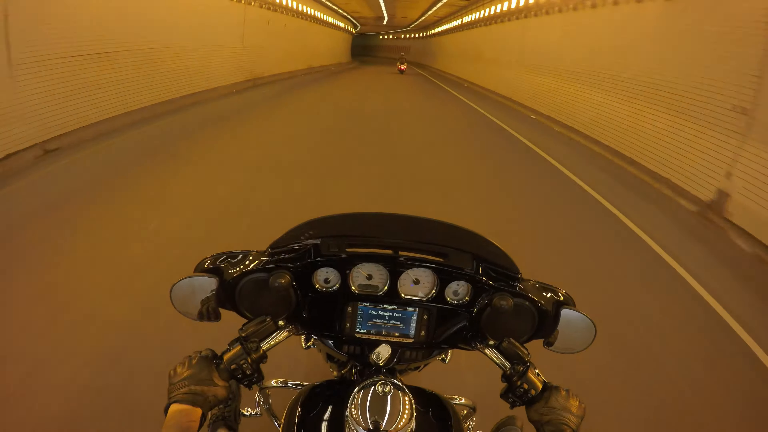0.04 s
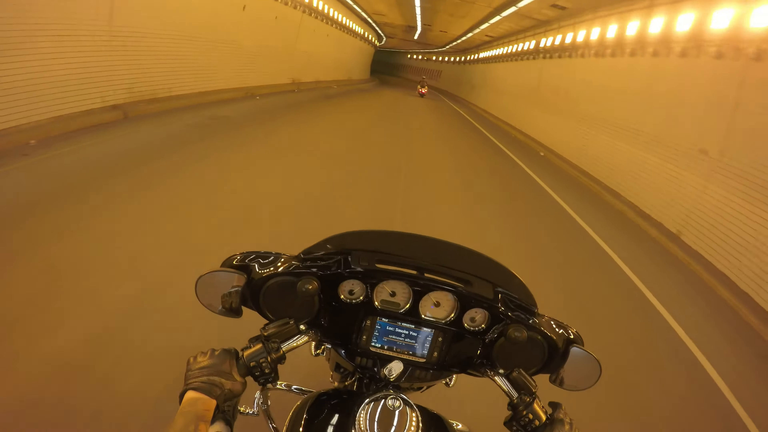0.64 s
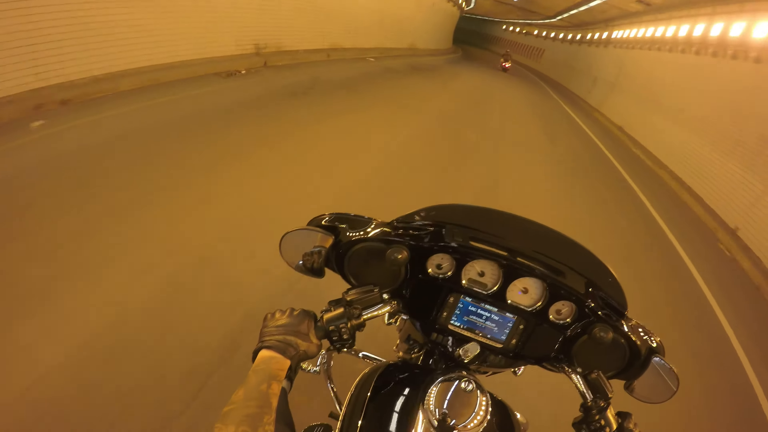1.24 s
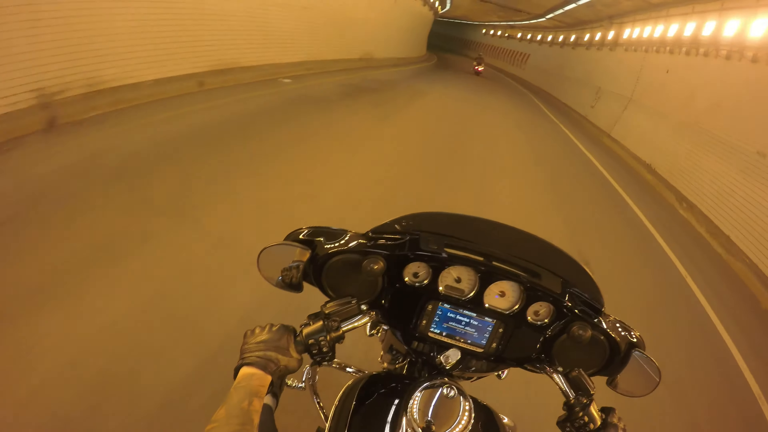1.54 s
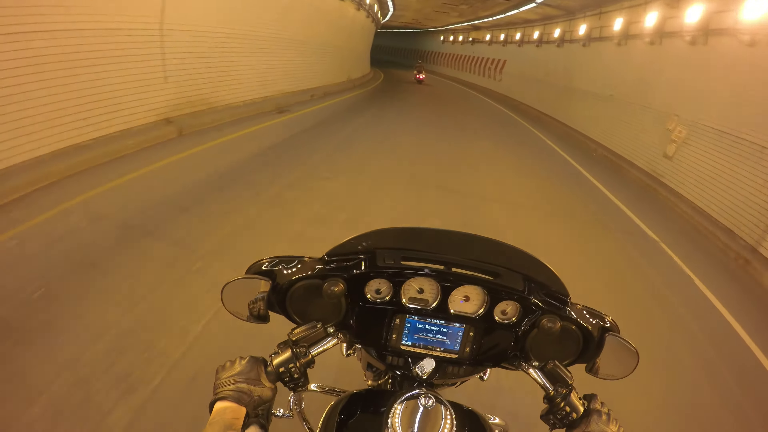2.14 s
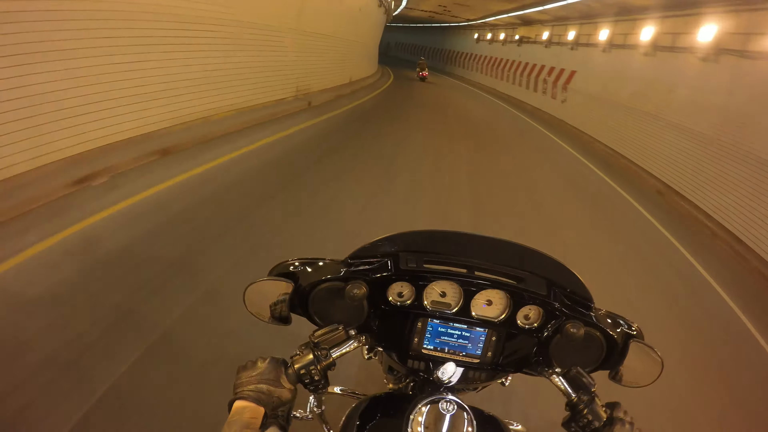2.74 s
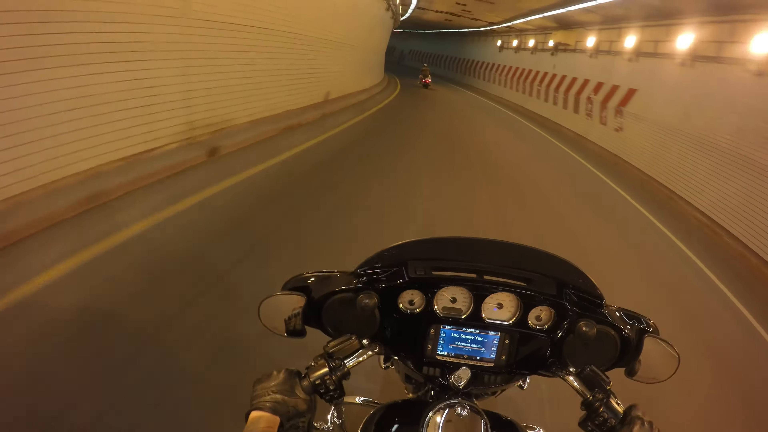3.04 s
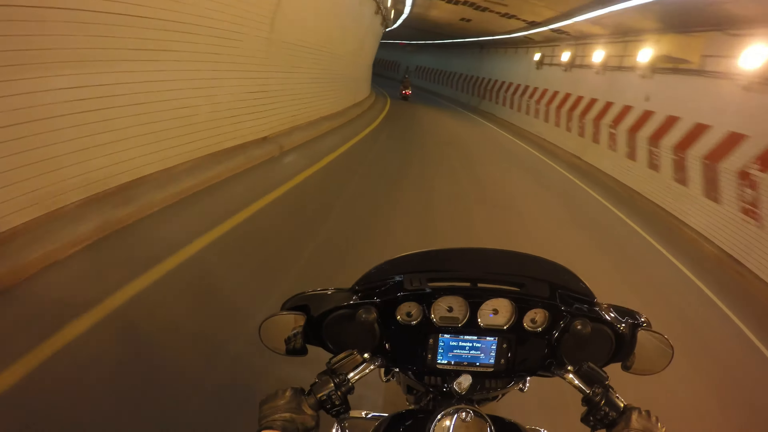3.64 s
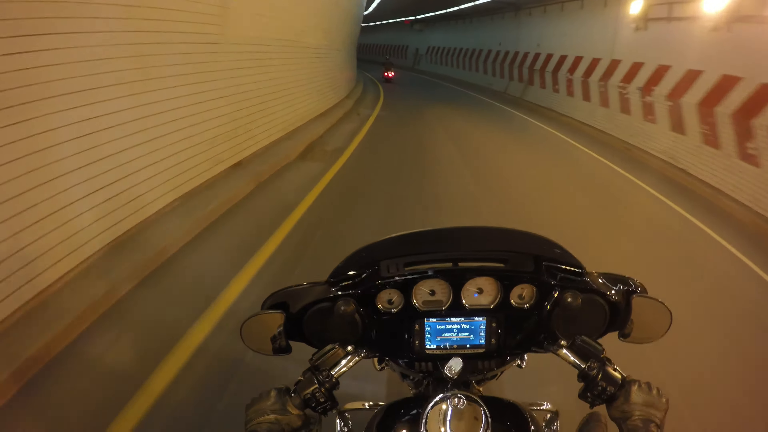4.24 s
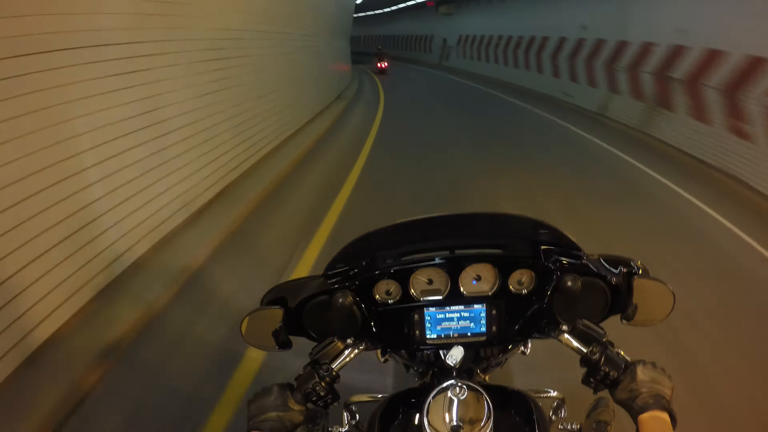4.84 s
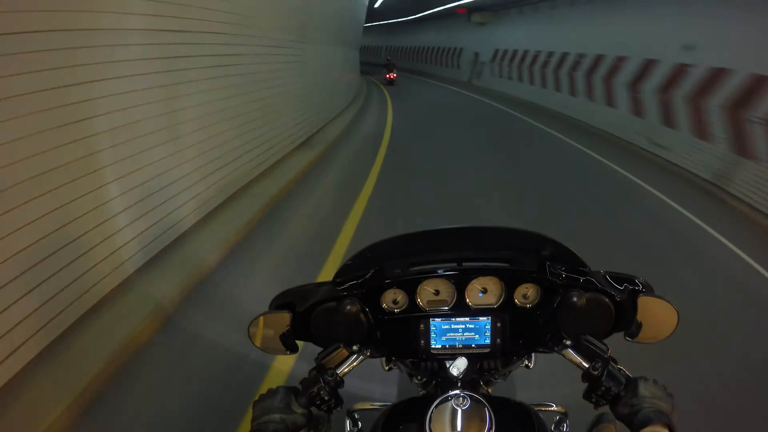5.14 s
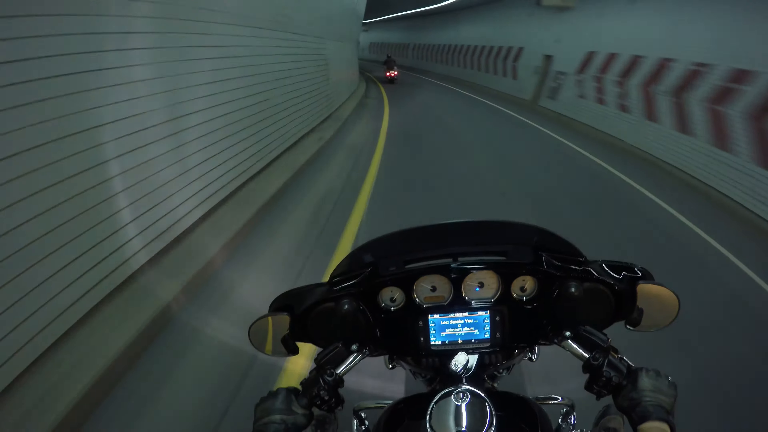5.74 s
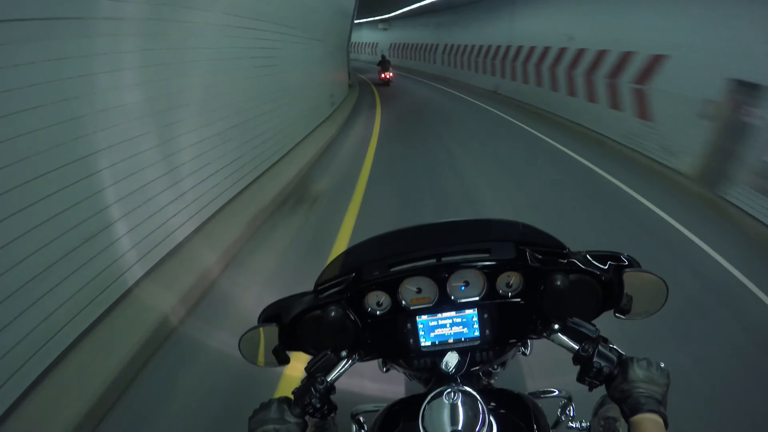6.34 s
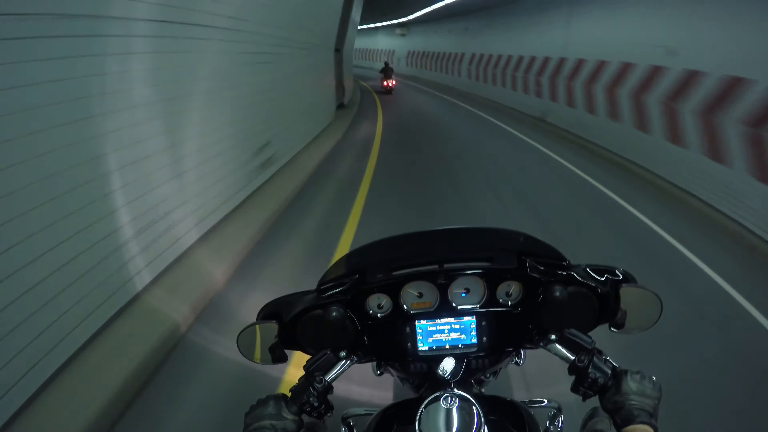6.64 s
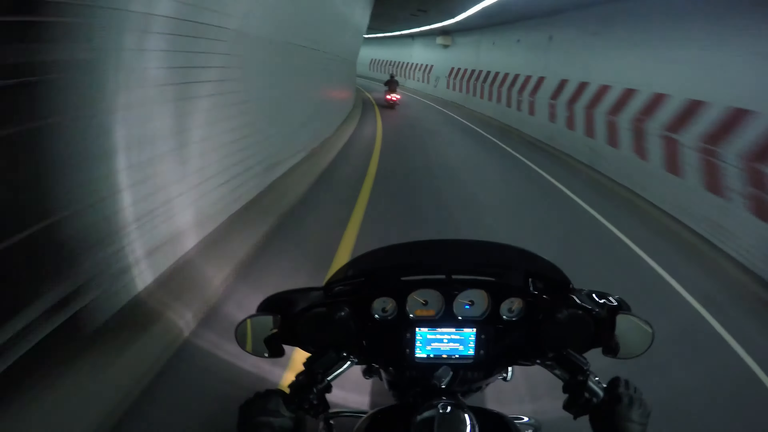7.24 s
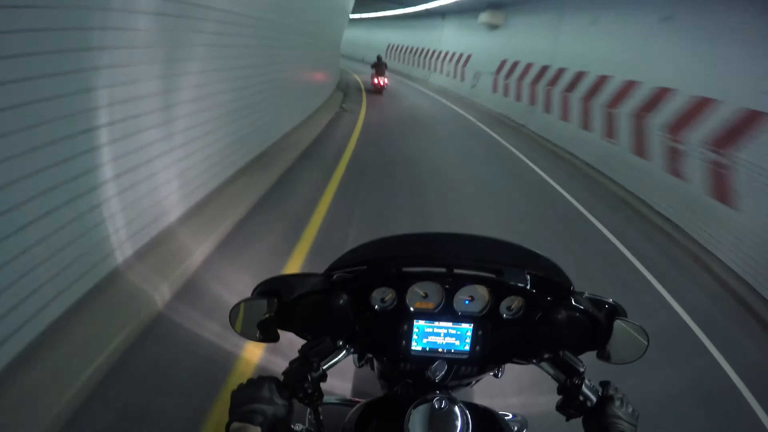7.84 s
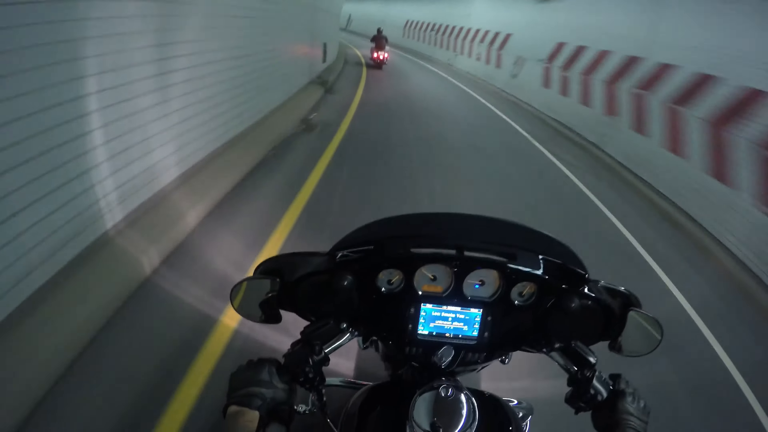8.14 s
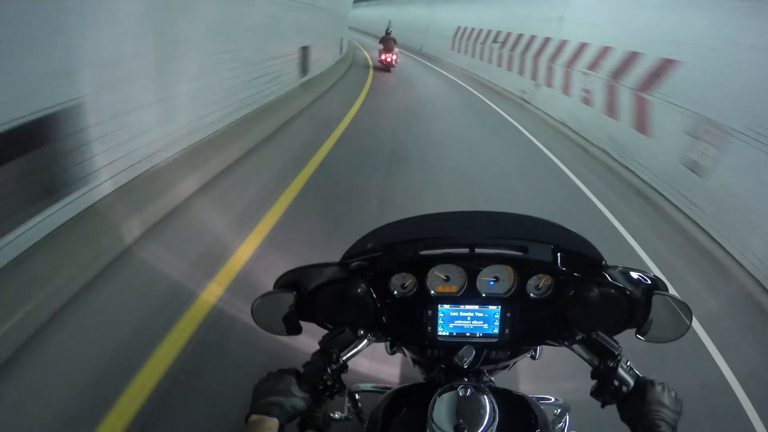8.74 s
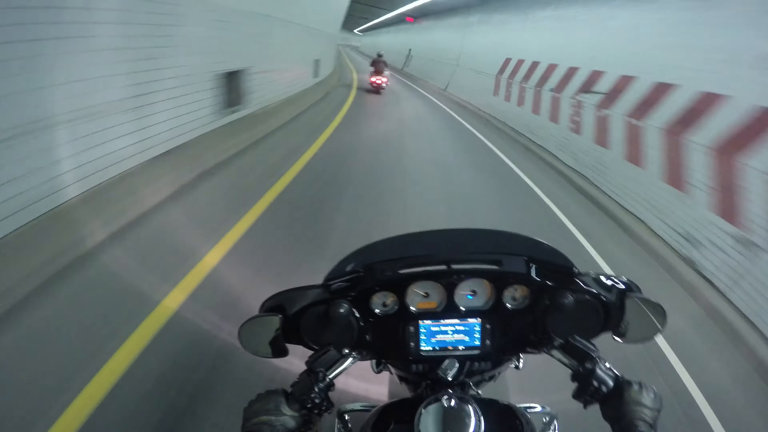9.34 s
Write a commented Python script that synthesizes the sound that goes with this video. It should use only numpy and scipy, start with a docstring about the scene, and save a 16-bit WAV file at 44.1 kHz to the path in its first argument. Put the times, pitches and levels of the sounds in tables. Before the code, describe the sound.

A V-twin motorcycle cruises through a road tunnel, its deep throb echoing under rushing wind, tyre roar and small plastic clicks.

```python
"""Inside a road tunnel, on a cruising V-twin motorcycle; close stereo microphone in the rider's camera.
From the start the engine throbs against its own echo, the walls smear the exhaust into a rumble, and
a first boom sinks away. Wind and tyre rush ring in the plastic housing, which ticks throughout.
Road jolts at once knock the mount and the housing clicks; the mount creaks at 2.3 s and 4.6 s.
With that second creak the tunnel booms loudest, and a last, softer boom rises at the end."""
import sys
import numpy as np
from scipy import signal
from scipy.fft import rfft, irfft, next_fast_len
from scipy.io import wavfile
from scipy.ndimage import uniform_filter1d, minimum_filter1d, map_coordinates

SR = 44100
rng = np.random.default_rng(int(sys.argv[2]) if len(sys.argv) > 2 else 0)


def unload_audio(sound):
    """Save the sound as a 16-bit wav file, at the path given as the first command line argument."""
    columns = np.transpose(np.atleast_2d(sound))
    # keep every value between -1 and 1, then stretch to whole-number steps
    steps = np.round(np.clip(columns, -1, 1) * 32767)
    wavfile.write(sys.argv[1], SR, steps.astype(np.int16))


N = 418950  # 9.5 s


def amp(db):
    """Decibels to gain."""
    return 10 ** (np.asarray(db) / 20)


def unit(x):
    """Scale to rms 1."""
    return x / np.sqrt(np.mean(x ** 2) + 1e-20)


def along(points, hz):
    """Read (freq_hz, value) points on a log frequency axis."""
    freqs, values = np.transpose(points)
    return np.interp(np.log(hz + 1), np.log(freqs + 1), values)


def curves(rows):
    """One value per sample for each column after the time."""
    times, *columns = np.transpose(rows)
    return [np.interp(np.arange(N) / SR, times, column) for column in columns]


def humps(rows, length_s):
    """A smooth hump at each (centre_s, height)."""
    t = np.arange(N) / SR
    return sum(height * np.exp(-(2 * (t - centre_s) / length_s) ** 2) for centre_s, height in rows)


def wobble(rate):
    """A smooth random curve of rms 1, rate knots a second."""
    knots = rng.standard_normal(int(N * rate / SR) + 4)
    return unit(map_coordinates(knots, [np.arange(N) * rate / SR]))


def filtered(x, response):
    """Filter x by a gain given as a function of frequency."""
    size = next_fast_len(N + SR // 2)
    return irfft(rfft(x, size) * response(np.fft.rfftfreq(size, 1 / SR)), size)[..., :N]


def add(track, start_s, x):
    """Mix x into the track at start_s."""
    part = track[max(round(start_s * SR), 0):][:len(x)]
    part += x[:len(part)]


# crank speed: time_s, turns_per_s
CRANK_SPEED = [(0.0, 46.5), (0.45, 43.3), (2.49, 46.0), (4.52, 41.0), (5.32, 46.0), (6.59, 42.0),
               (8.68, 44.9), (9.1, 41.0), (9.5, 55)]

def crank_turns():
    """Turns of the crankshaft so far, at each sample."""
    return np.cumsum(curves(CRANK_SPEED)[0]) / SR


# engine throb, heard from the saddle: time_s, level_db (before trim)
THROB_LEVEL = [(0, -33), (0.26, -13), (0.7, -18.5), (1.1, -16.0), (3.4, -15), (4.45, -23.5), (5.1, -15.0),
               (6.8, -18.5), (7.4, -14.5), (9.5, -18)]
# its strongest surges and deepest fades: centre_s, lift_db
THROB_SURGES = [(0.77, -6), (0.9, 2), (1.33, -9), (1.49, 3.5), (2.12, 4), (2.37, 1), (2.5, -15),
                (2.97, 2.5), (3.75, -10), (4.24, 8.5), (4.4, -10), (5.9, 7.5), (6.28, 6.5), (6.48, 8),
                (6.67, -10), (8.08, 5.5), (8.35, -17)]

def engine_throb(turns, beat_hz=3.3, echo_gain=.33, trim_db=-0.5):
    """A deep tone at the firing rate beats against its pitch-shifted echo off the passing wall."""
    level_db = curves(THROB_LEVEL)[0] + humps(THROB_SURGES, length_s=0.078)
    phase = 2 * np.pi * turns + 0.3 * wobble(14)
    echo_shift = 2 * np.pi * beat_hz * np.arange(N) / SR + 1.58 * wobble(6)
    tone = np.sin(phase) + echo_gain * np.sin(phase + echo_shift)
    return amp(level_db + trim_db) * unit(tone)


# decay off the tunnel walls: freq_hz, t60_s
WALL_DECAY = [(40, 2.03), (300, 1.5), (3000, 0.42)]

def tunnel_echo(x, drift_rad=1.69):
    """The long tail of the tiled tube, its phase drifting as the walls go by."""
    hz, t, noise = signal.stft(rng.standard_normal(SR), SR, nperseg=1024)
    decay = amp(-60 * t / along(WALL_DECAY, hz)[:, None])
    tail = signal.istft(noise * decay, SR, nperseg=1024)[1]
    echo = signal.fftconvolve(np.r_[x[-SR:], x], tail)[SR:SR + N]  # the tube is already ringing
    return unit(np.real(signal.hilbert(echo) * np.exp(1j * drift_rad * wobble(12))))


# levels along the tunnel, before trim: time_s, exhaust_db, tyres_db
TUNNEL_LEVELS = [(0.0, -20.5, -35.5), (2.33, -23, -32), (3.17, -25, -33.5), (4.66, -17.5, -32),
                 (5.61, -23, -33), (6.51, -26, -33.5), (6.93, -18, -33.5), (7.43, -25, -31.5),
                 (8.89, -22.5, -35), (9.5, -18, -34)]
# exhaust rumble at the microphone: freq_hz, gain_db
EXHAUST_SPECTRUM = [(5, -50), (25, -11), (48, -13), (64, 8.5), (74, -0.5), (88, -8.5), (112, 1), (135, -7),
                    (155, -16.5), (178, -9.5), (215, -25), (280, -27), (420, -31), (900, -61.5)]

def exhaust(turns, scatter=0.65, echo_db=7, trim_db=-1):
    """Two unevenly spaced firings every two turns, mostly heard off the walls."""
    level_db = curves(TUNNEL_LEVELS)[0]
    pulses = np.zeros(N)
    for crank_deg in (0, 315):
        firings = np.flatnonzero(np.diff(np.floor(turns / 2 - crank_deg / 720)))
        pulses[firings] = 1 + scatter * rng.standard_normal(SR)[:len(firings)]
    echoes = sum(tunnel_echo(pulses) for _ in range(3))
    wash = unit(pulses) + amp(echo_db) * unit(echoes)
    rumble = filtered(wash, lambda hz: amp(along(EXHAUST_SPECTRUM, hz)))
    return amp(level_db + trim_db) * unit(rumble)


# booms between bike and wall: peak_s, level_db, pitch_hz, glide_octaves_per_s, rise_s, fall_s
WALL_BOOMS = [(0.101, -21, 91.8, -1.0, .3, .75), (4.65, -18, 110, .75, 0.96, .4),
              (9.5, -24, 85, .65, .6, .3)]

def wall_booms(spread_hz=34, octave_db=-17, top_hz=120.3):
    """A broad air resonance and its octave swell and glide, higher as the wall comes closer."""
    def slow_noise(corner_hz):
        real, imag = filtered(rng.standard_normal((2, N)), lambda hz: (1 + (hz / corner_hz) ** 2) ** -2)
        return unit(real) + 1j * unit(imag)

    low, octave = slow_noise(spread_hz), slow_noise(2 * spread_hz)
    out, t = np.zeros(N), np.arange(N) / SR
    for peak_s, level_db, pitch_hz, glide, rise_s, fall_s in WALL_BOOMS:
        hz = np.minimum(pitch_hz * 2 ** (glide * (t - peak_s)), top_hz)
        carrier = np.exp(2j * np.pi * np.cumsum(hz) / SR)
        swell = np.exp(-((t - peak_s) / np.where(t < peak_s, rise_s, fall_s)) ** 2)
        out += amp(level_db) * swell * np.real(low * carrier + amp(octave_db) * octave * carrier ** 2)
    return out


# wind pressure right on the microphone: freq_hz, gain_db
BUFFET_SPECTRUM = [(4, -40), (14, -4), (24, 1.5), (34, -1.5), (48, -2), (70, -5), (90, -6.5), (125, -9.5),
                   (180, -15.5), (250, -29), (600, -66.5)]

def wind_buffet(level_db=-21, gust_db=2.7, side_db=-33):
    """Low eddies press on both microphone ports, almost alike."""
    mid, side = filtered(rng.standard_normal((2, N)), lambda hz: amp(along(BUFFET_SPECTRUM, hz)))
    eddies = mid + amp(side_db) * np.array([side, -side])
    return amp(level_db) * unit(eddies * amp(gust_db * wobble(7)))


# how the two channels differ: freq_hz, side_minus_mid_db
CHANNEL_DIFFERENCE = [(120, -52), (240, -22), (900, -26), (2000, -26.5), (3700, -28.5), (4500, -18),
                      (7300, -16.5), (14000, -12.5)]

def port_noise():
    """White noise in the two channels, less alike in the treble."""
    mid, side = rng.standard_normal((2, N))
    side = filtered(side, lambda hz: amp(along(CHANNEL_DIFFERENCE, hz)))
    return np.array([mid + side, mid - side])


# air modes of the housing around the microphone: pitch_hz, width_hz, lift_db
HOUSING_MODES = [(634, 48, 6), (1095, 20, 1), (1318, 87, 5), (1419, 63, 5), (1500, 74, 2), (2257, 76, 3.5),
                 (2490, 146, 5), (3330, 59, 3.5), (3698, 230, 4), (4535, 150, 3.5), (5620, 100, 4),
                 (6260, 200, 4), (6940, 240, 6.5), (9850, 550, 4)]

def housed(x, spectrum):
    """Colour x with a spectrum lifted by the housing's ringing air modes."""
    hz = np.fft.rfftfreq(8192, 1 / SR)
    modes_db = sum(lift / (1 + (2 * (hz - pitch) / width) ** 4) for pitch, width, lift in HOUSING_MODES)
    cepstrum = irfft(np.log(amp(along(spectrum, hz) + modes_db)))
    half = len(cepstrum) // 2
    fold = np.r_[1, np.full(half - 1, 2), np.zeros(half)]  # minimum phase: ringing follows its cause
    impulse = irfft(np.exp(rfft(cepstrum * fold)))
    return signal.fftconvolve(x, impulse[None], axes=1)[:, :N]


# air flowing over the housing: time_s, level_db (before trim)
WIND_LEVEL = [(0, -26.5), (0.38, -20.5), (0.52, -23), (1.1, -23.0), (1.33, -27.5), (1.68, -21.5),
              (2.44, -21.5), (2.54, -24.5), (4.45, -22.5), (4.65, -23.5), (4.9, -22.5), (6.1, -24.5),
              (7.15, -22.5), (7.3, -20.0), (8.02, -21), (8.15, -27), (8.6, -27), (9.5, -26.5)]
# gusts and lulls off the fairing: centre_s, lift_db
WIND_GUSTS = [(0.1, 3.5), (0.21, 4.5), (0.28, -3), (0.37, 2), (0.98, 2.5), (1.31, -2.5), (4.13, 3),
              (5.18, 3.5), (5.65, 2), (5.79, -2.5), (5.89, 2.5), (6.2, -2.5), (6.28, 4.5), (6.82, 5),
              (7.0, 5.5), (7.19, -4), (7.25, 0), (8.25, 3.5)]
# hiss and contacts on the housing, heard from inside: freq_hz, gain_db
SHELL_SPECTRUM = [(900, -36), (1700, -11), (2200, 0), (2900, 1), (3500, 0), (3980, -2), (4200, -11),
                  (5200, -15), (5900, -23.5), (6700, -20.5), (8000, -30), (10500, -31), (13000, -35.5),
                  (15000, -51)]

def wind_hiss(turns, eddy_db=0.47, flutter_db=1.29, grit_db=0.75, trim_db=-0.36):
    """Air hisses over the housing, gusting, fluttering and shaken by the engine."""
    level_db = curves(WIND_LEVEL)[0] + humps(WIND_GUSTS, length_s=0.056)
    flow = amp(eddy_db * wobble(13) + flutter_db * wobble(35) + grit_db * wobble(500))
    shake = 1 + 0.066 * np.sin(2 * np.pi * turns)
    return amp(level_db + trim_db) * unit(housed(port_noise() * flow * shake, SHELL_SPECTRUM))


# tyres on the road below the rider: freq_hz, gain_db
TYRE_SPECTRUM = [(150, 0.5), (300, -3.5), (560, -3), (720, 1.5), (950, -1), (1200, -3), (1700, -4),
                 (2400, -6), (4200, -14.5), (5200, -12.5), (7500, -22.5), (10500, -32), (13000, -36),
                 (15000, -48)]

def tyre_roar(flutter_db=1, trim_db=3):
    """Tyre roar fills the tunnel and rings in the housing."""
    level_db = curves(TUNNEL_LEVELS)[1]
    roar = port_noise() * amp(flutter_db * wobble(25))
    return amp(level_db + trim_db) * unit(housed(roar, TYRE_SPECTRUM))


def plastic_ticks(ticks_per_s=22, below_wind_db=15):
    """Loose plastic ticks at random, harder when the wind is strong."""
    wind_db = curves(WIND_LEVEL)[0]
    contacts = (rng.random(N) < ticks_per_s / SR) * rng.uniform(-0.85, 1, N)
    return amp(wind_db - below_wind_db) * unit(housed(contacts[None], SHELL_SPECTRUM))


def ring(modes, t, detune, attack_s=0.0016):
    """Damped modes struck at t = 0, slightly retuned at each strike; peak 1."""
    x = np.zeros(len(t))
    for pitch_hz, width_hz, gain_db in modes:
        hz = pitch_hz * (1 + detune * rng.standard_normal())
        x += amp(gain_db) * np.exp(-np.pi * width_hz * t) * np.sin(2 * np.pi * hz * t)
    x *= 1 - np.exp(-t / attack_s)
    return x / np.abs(x).max()


# hardest road jolts reaching the camera: start_s, strength_db
ROAD_JOLTS = [(0.089, -17.5), (0.191, -17), (0.44, -17), (0.755, -14.5), (0.88, -17), (0.976, -20),
              (1.163, -20), (1.245, -19), (1.559, -19), (1.67, -17), (1.812, -14.5), (2.155, -16),
              (2.46, -17.5), (2.634, -19.5), (2.687, -16.5), (2.936, -20), (3.599, -17), (3.885, -17.5),
              (4.322, -16.5), (4.826, -17.5), (5.087, -18), (5.45, -19.5), (6.082, -20), (6.267, -18),
              (7.001, -17.5), (7.242, -18), (7.652, -19), (9.016, -20)]
# modes of the camera mount: pitch_hz, width_hz, gain_db
MOUNT_MODES = [(322, 180, -1), (651, 67, 14), (766, 140, 4)]

def road_jolts(bumps_per_s=6, knock_db=-3, bounce_db=-2, bounce_s=.007, chatter_db=-5.5, chatter_s=.0066):
    """Each jolt or lesser random bump bounces the mount while the housing's chatter swells and dies."""
    knocks, chatter, t = np.zeros(N), np.zeros(N), np.arange(SR // 6) / SR
    hiss = unit(housed(port_noise(), SHELL_SPECTRUM))
    swell = t / chatter_s * np.exp(1 - t / chatter_s)
    bump_times = np.cumsum(.5 + rng.random(120)) / bumps_per_s
    bump_db = rng.normal(-27, 4, 120)
    for start_s, strength_db in [*ROAD_JOLTS, *zip(bump_times, bump_db)]:
        gaps = bounce_s * (.5 + rng.random(4))
        for bounce, delay in enumerate(np.cumsum(gaps) - gaps[0]):
            knock = ring(MOUNT_MODES, t, detune=.035, attack_s=0.00045)
            add(knocks, start_s + delay, amp(strength_db + knock_db + bounce * bounce_db) * knock)
        add(chatter, start_s, amp(strength_db + chatter_db) * swell)
    return knocks + chatter * hiss


# sharp clicks right beside the microphone: start_s, level_db (before trim)
HOUSING_CLICKS = [(0.197, -12), (0.24, -5.5), (0.576, -8), (0.665, -5.5), (1.246, -6), (1.7963, -7),
                  (2.687, -6), (6.5992, -9.5)]

def housing_clicks(crack_t60_s=.015, rattle_t60_s=0.046, rattle_db=-6, trim_db=-4):
    """Hard plastic contacts: a brief crack and a short rattle."""
    force, t = np.zeros(N), np.arange(SR // 8) / SR
    crack = amp(-60 * t / crack_t60_s)
    rattle = amp(rattle_db - 60 * t / rattle_t60_s)
    for start_s, level_db in HOUSING_CLICKS:
        add(force, start_s, amp(level_db + trim_db) * np.maximum(crack, rattle))
    noise = port_noise()
    return housed(noise * force, SHELL_SPECTRUM) / np.std(housed(noise, SHELL_SPECTRUM))


# low and high modes of the mount's joint: pitch_hz, width_hz, gain_db
JOINT_LOW_MODES = [(980, 50, 10), (1052, 27, 16)]
JOINT_HIGH_MODES = [(1330, 26.4, 2), (1420, 36, 4), (1470, 51, -6)]
# creaks close to the microphone: start_s, length_s, low_ring_db, high_ring_db (before trim)
MOUNT_CREAKS = [(2.31, .01, -25, -36), (4.636, .06, -22.5, -17.5)]

def mount_creaks(slip_s=.0105, scatter=.3, spread_db=2.5, trim_db=2.5):
    """The mount's joint slips in a quick, uneven run; every slip rings it anew."""
    out, t = np.zeros(N), np.arange(SR // 8) / SR
    for start_s, length_s, low_db, high_db in MOUNT_CREAKS:
        for delay in np.arange(0, length_s, slip_s):
            late, low_jitter, high_jitter = rng.standard_normal(3)
            low = amp(low_db + spread_db * low_jitter) * ring(JOINT_LOW_MODES, t, detune=0.02)
            high = amp(high_db + spread_db * high_jitter) * ring(JOINT_HIGH_MODES, t, detune=0.0099)
            add(out, start_s + delay + scatter * slip_s * late, low + high)
    return amp(trim_db) * out


def scene():
    """Engine, air, road and mount, as they reach the rider's microphone."""
    turns = crank_turns()
    engine = engine_throb(turns) + exhaust(turns) + wall_booms()
    rush = wind_buffet() + wind_hiss(turns) + tyre_roar()
    return engine + rush + road_jolts() + housing_clicks() + plastic_ticks() + mount_creaks()


def record(dry):
    """The camera's limiter catches the highest peaks; nothing is kept above its band limit."""
    ceiling, top_hz = .89, 15250
    needed_gain = np.minimum(1, ceiling / (np.abs(dry).max(axis=0) + 1e-9))
    gain = uniform_filter1d(minimum_filter1d(needed_gain, size=900), size=800)  # hold, then smooth
    return filtered(dry * gain, lambda hz: hz < top_hz)


dry = scene()
out = record(dry)
unload_audio(out)
```